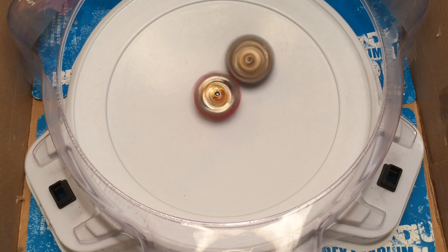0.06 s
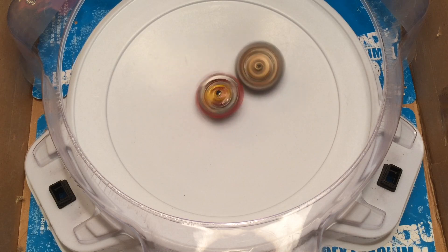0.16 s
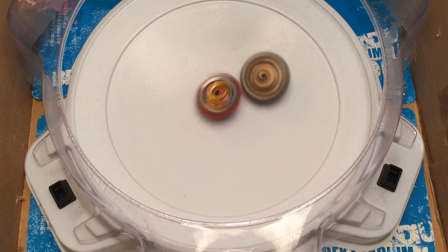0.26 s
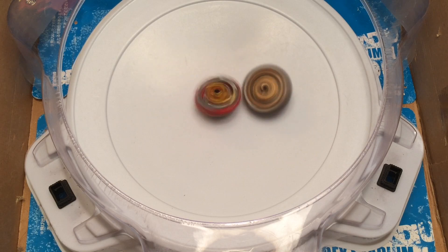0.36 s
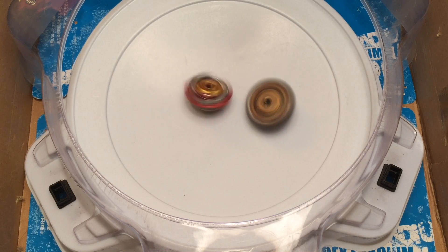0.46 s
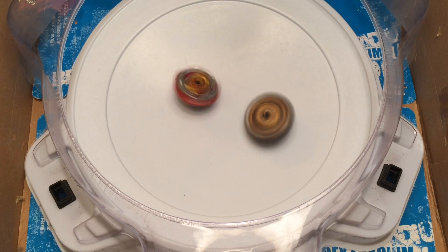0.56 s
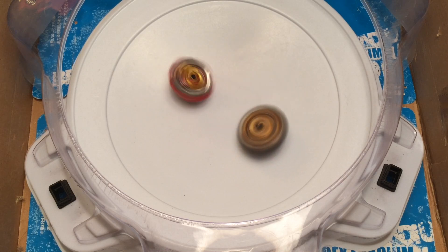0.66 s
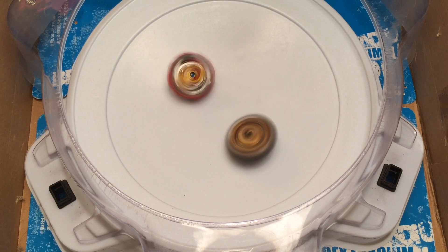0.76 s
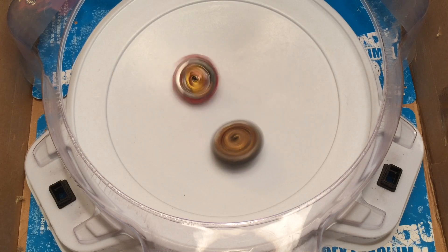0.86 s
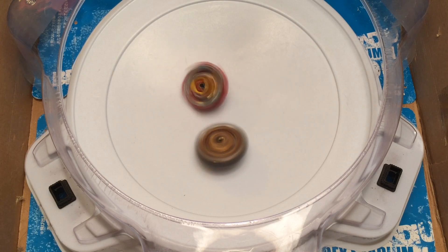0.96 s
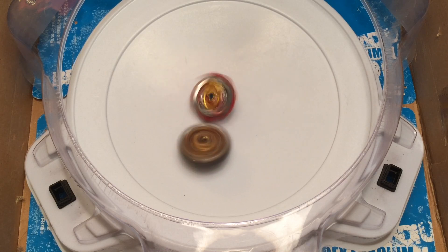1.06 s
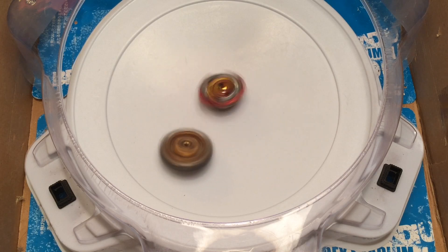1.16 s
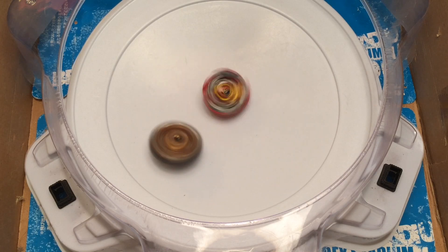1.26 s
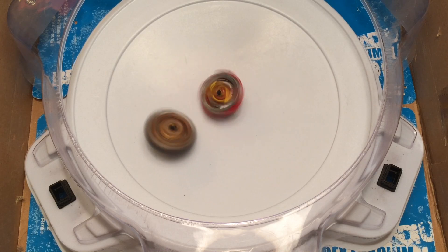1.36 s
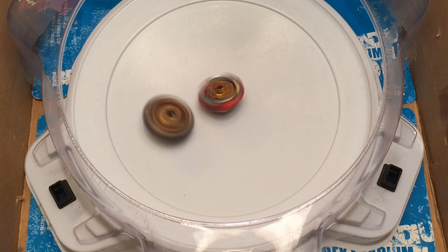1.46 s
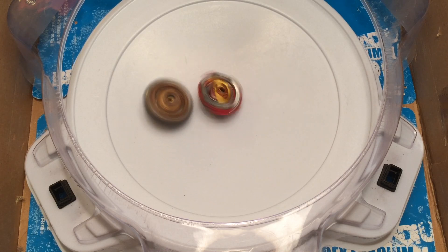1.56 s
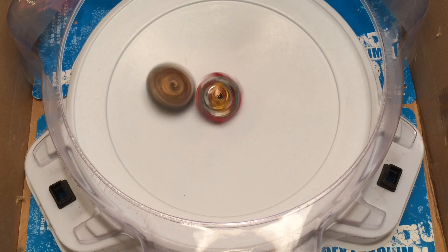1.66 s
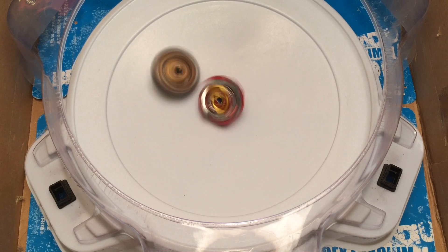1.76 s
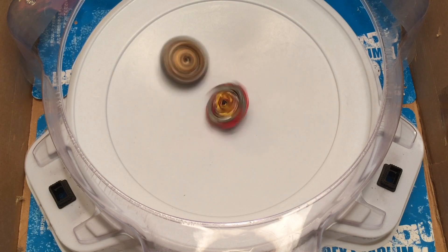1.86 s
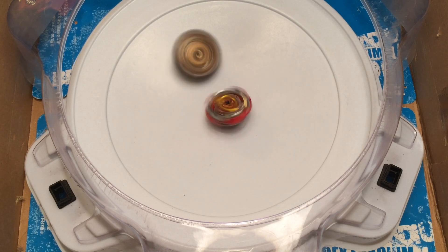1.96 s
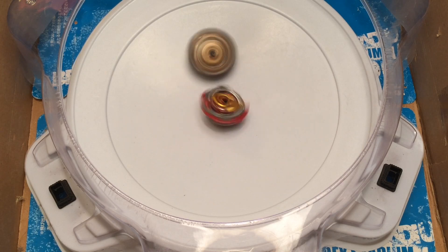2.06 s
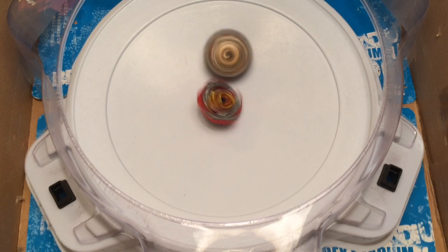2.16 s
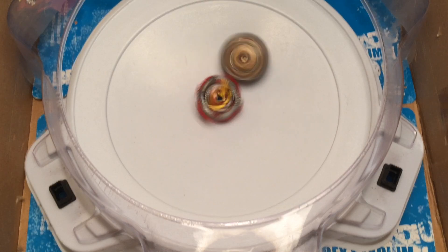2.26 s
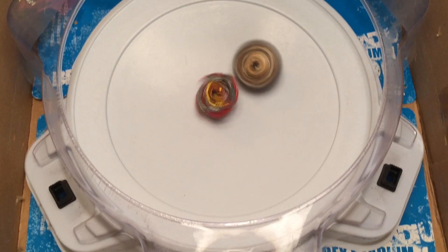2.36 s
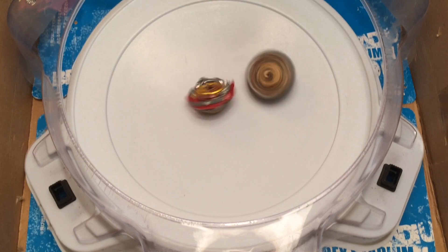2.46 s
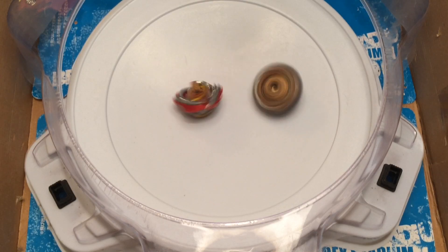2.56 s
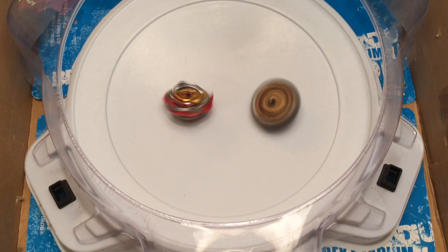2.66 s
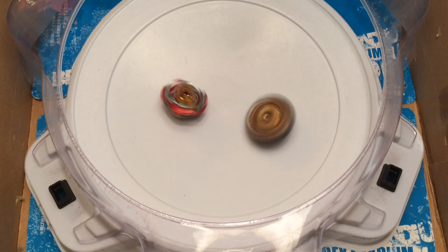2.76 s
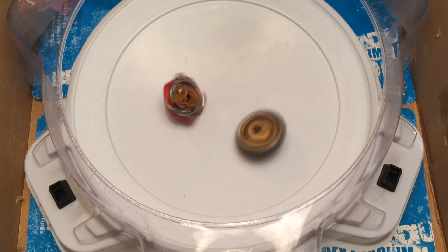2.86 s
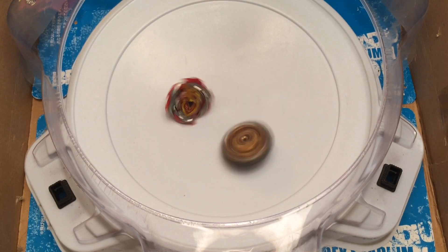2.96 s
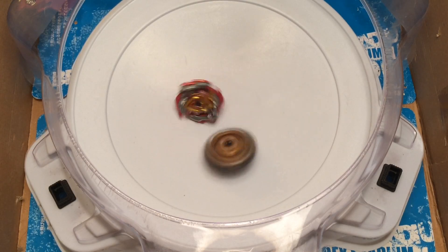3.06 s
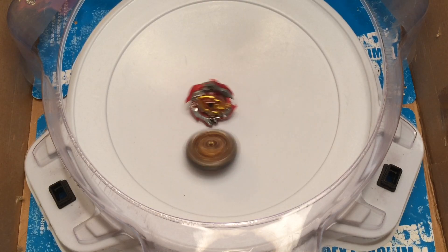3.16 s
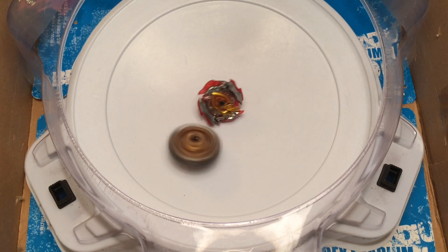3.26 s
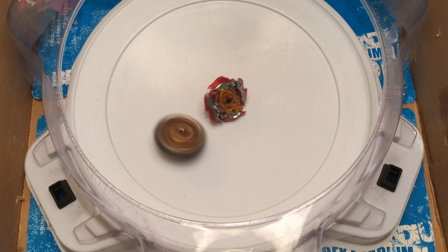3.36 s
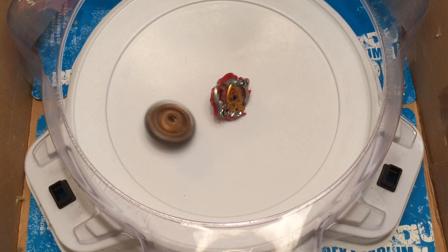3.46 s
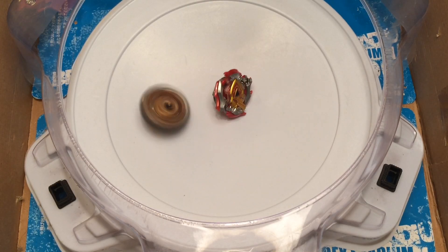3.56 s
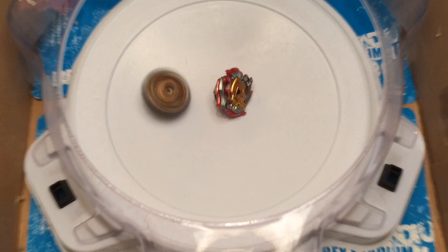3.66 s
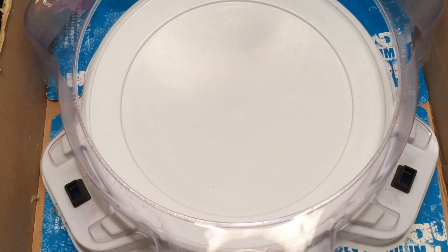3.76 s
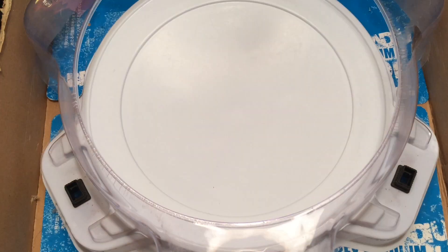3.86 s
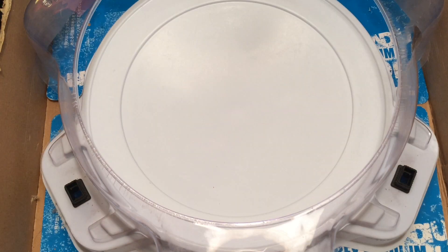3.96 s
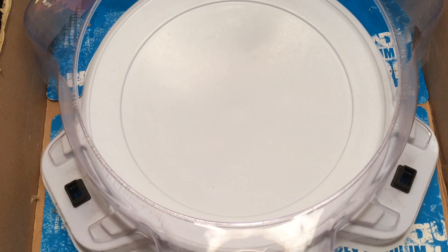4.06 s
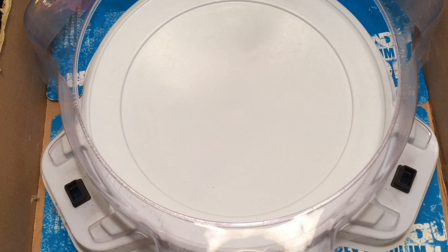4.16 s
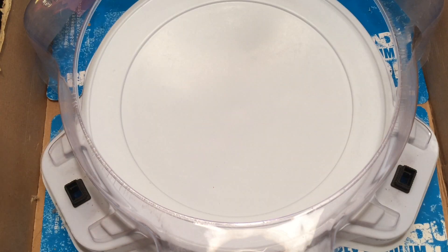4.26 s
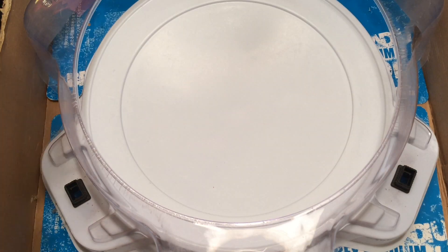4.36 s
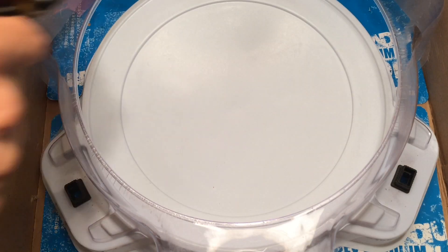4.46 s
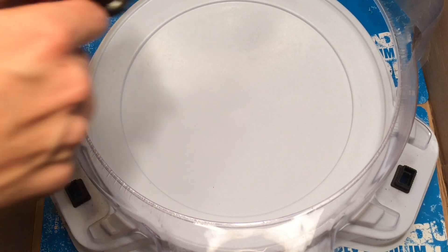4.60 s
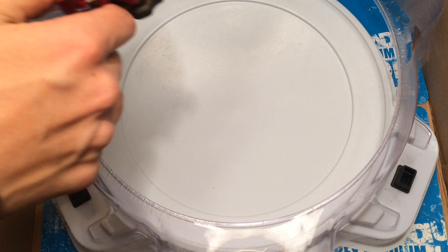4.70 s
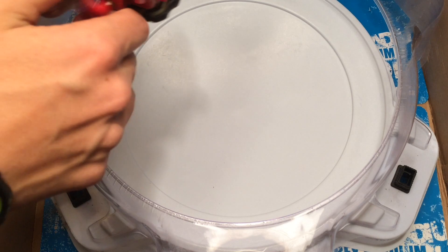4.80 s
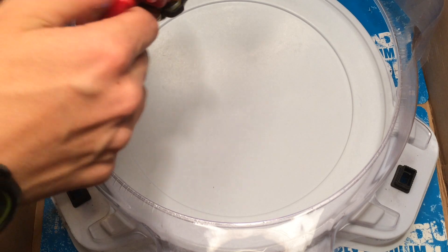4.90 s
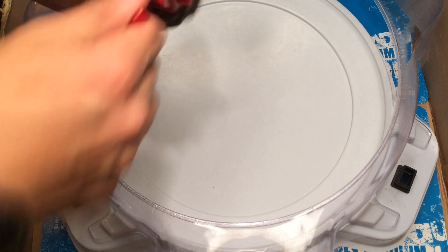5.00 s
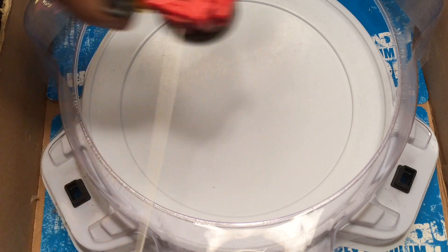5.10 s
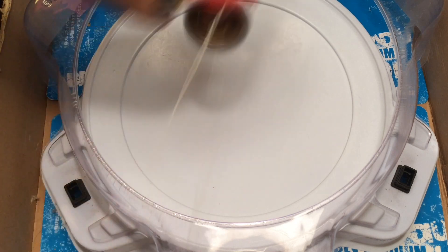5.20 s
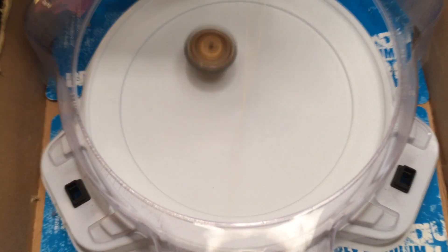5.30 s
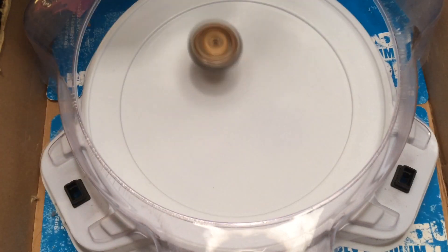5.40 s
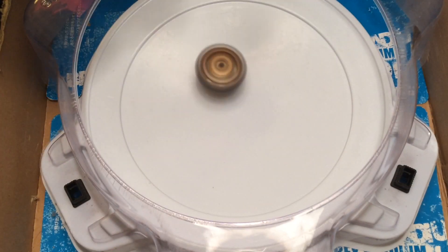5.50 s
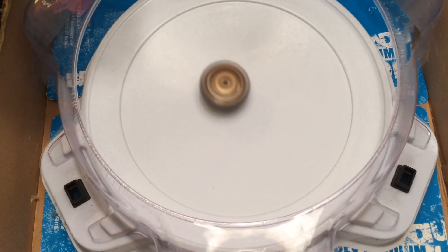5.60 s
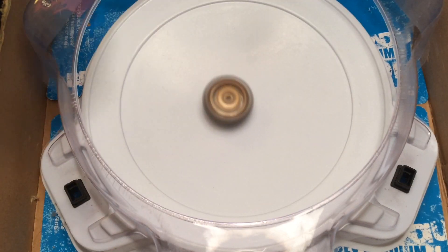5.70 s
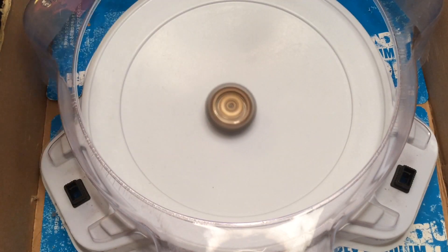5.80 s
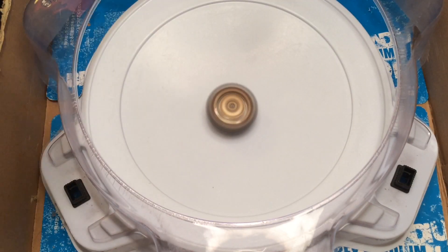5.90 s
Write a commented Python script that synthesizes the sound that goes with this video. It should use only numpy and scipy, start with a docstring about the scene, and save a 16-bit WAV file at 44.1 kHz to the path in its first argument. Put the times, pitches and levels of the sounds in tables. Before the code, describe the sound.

Close up in a quiet, small room, a pair of toy tops whirs and rattles on a plastic arena floor, clashing four times with bright metallic clacks. After a sudden lull and a few small plastic clicks, a launcher's cord is pulled with a loud zipping rasp. A single top clatters into the bowl amid a sharp snap and a high ping, then hops and keeps spinning with a drumming hum.

```python
"""Two toy tops with metal rings spin in a plastic bowl: their tips whir on it and a loose part ticks once
a turn. They clash four times, setting the rings singing, and then a top hops twice. The sound fades to a
quiet room, where a hand clicks a top into a launcher and rips the toothed cord. The top drops into the
bowl, a metal part of the launcher pings, and the top bounces, skips and spins on alone."""
import sys
import numpy as np
from scipy import signal
from scipy.fft import rfft, irfft, next_fast_len
from scipy.io import wavfile
from scipy.ndimage import uniform_filter1d

SR = 44100
rng = np.random.default_rng(int(sys.argv[2]) if len(sys.argv) > 2 else 0)


def inscribe(sig):
    """Save sig as 16-bit PCM at rate SR to the path in sys.argv[1].

    A 1-D sig is mono; a 2-D sig holds one channel per row.
    Samples are clipped to [-1, 1] before scaling.
    """
    pcm = np.round(np.clip(np.atleast_2d(sig).T, -1, 1) * 32767)
    wavfile.write(sys.argv[1], SR, pcm.astype(np.int16))


N = 261954
T = np.arange(N) / SR


# How loud the tips roll, one list a round: time_s, rumble_db, boom_db, fizz_db
ROLLING_LEVELS = [
    [(0.0, -43, -46.5, -43.5), (0.3, -44, -49.5, -50.5), (0.6, -45.5, -46, -49), (1.1, -43, -43.5, -50),
     (1.3, -46.5, -55, -51), (1.65, -45, -45, -47.5), (2.25, -42.5, -53.5, -45.5), (2.5, -45, -55.5, -46.5),
     (3.15, -45.5, -47, -46.5), (3.84, -45, -55.5, -47.5), (3.86, -64, -64, -59.5)],
    [(5.36, -9.5, -24, -24.5), (5.42, -29, -45, -22.5), (5.488, -77, -35, -32), (5.636, -49, -27, -28.5),
     (5.792, -28, -34, -31.5), (5.94, -22, -27, -31.5)],
]
# A "tone" says how strong a noise is, low to high. Every tone has: pitch_hz, level_db
RUMBLE_TONE = [(140, -37), (230, -12), (285, -4), (324, -4), (407, -0.5), (561, -1.5), (612, -2.5),
               (775, -8), (1170, -6), (1280, -12), (1830, -14), (2720, -13.5), (3000, -13.5), (3900, -46.5),
               (6600, -120)]  # two tops
LONE_RUMBLE_TONE = [(140, -39), (230, 4), (259, -30), (291, -6), (369, -7.5), (398, -4.5), (580, -0.5),
                    (862, -15), (2290, -21.5), (3000, -18.5), (3900, -36), (6600, -120)]  # one fast top near the middle
BOOM_TONE = [(18, -43.5), (30, -13), (72, -2.5), (96, 1), (140, -5), (209, -10), (230, -8.5), (300, -40),
             (510, -120)]  # the bowl's floor
FIZZ_TONE = [(880, -34), (1500, 3), (2730, -4), (3020, 1), (3550, 0), (3920, 1.5), (4420, -3), (6940, -2.5),
             (8390, -9.5), (9180, -11), (15100, -15), (15900, -18.5), (16400, -40)]  # the tips' high hiss
def rolling_tips():
    """Tips grind on the bowl, pressing harder once a turn; the shaking keeps the rings singing."""
    tick_s = tick_times()
    alone = T > ROLLING_LEVELS[1][0][0]
    tick_turns = np.interp(T, tick_s, np.arange(len(tick_s)))
    turns = np.where(alone, lone_turns(), tick_turns - 0.25)  # press a quarter turn after the tick
    throb_db = np.where(alone, 3.5, 1.0) * np.cos(2 * np.pi * turns)
    wobble = evened(uniform_filter1d(uniform_filter1d(noise(N), 500), 500))
    press = gain_of(throb_db + 1.7 * wobble)
    boom = colour(press * noise(N), BOOM_TONE)
    fizz = colour(press ** 1.36 * grit(per_s=15000, size_db=1.3), FIZZ_TONE)
    shaking = colour(press * grit(per_s=3000, size_db=2.7), [(3000, 9), (15000, -11)])
    fizz += gain_of(-16.5) * shaken(shaking, struck(RING_NOTES, damping=1.1))
    out = np.zeros(N)
    for rows, tone in zip(ROLLING_LEVELS, (RUMBLE_TONE, LONE_RUMBLE_TONE)):
        rumble = colour(press * grit(per_s=9000, size_db=2.2), tone)
        rumble += gain_of(-9.5) * shaken(rumble, struck(BOWL_NOTES, damping=1.2))
        time_s, *levels_db = np.transpose(rows)
        for db, layer in zip(levels_db, (rumble, boom, fizz)):
            out += gain_of(np.interp(T, time_s, db, left=-140, right=-140)) * layer
    return out


# The ticking top's spin, at the start and after each clash: first_tick_s, turn_s
SPINS = [(.0218, .0325), (.5256, .03328), (1.1773, .03508), (1.8569, .03664), (2.5304, .03889)]
def tick_times(slowing_s=.00008, round_end_s=3.83):
    """One tick a turn; rubbing makes each turn a little longer than the last."""
    ends = [row[0] for row in CLASHES] + [round_end_s]
    turn = np.arange(60)
    runs = [first_s + turn * turn_s + slowing_s * turn ** 2 / 2 for first_s, turn_s in SPINS]
    return np.concatenate([run[run < end] for run, end in zip(runs, ends)])


# The launched top slowing down: time_s, turns_per_s
LONE_SPIN = [(5.4, 64), (5.94, 53)]
def lone_turns():
    """Counts the turns of the launched top."""
    return np.cumsum(np.interp(T, *np.transpose(LONE_SPIN))) / SR


# How hard the loose part knocks: time_s, level_db, ring_offset_db, tock_offset_db
RATTLE = [(0, -47.5, -13, -12), (.15, -42.5, 1, -12), (.56, -34, -12, 10), (0.599, -21.5, -14, 0.5),
          (.8, -28, -6, -9.5), (0.921, -22.5, -13.5, -8), (1.14, -24, -8.5, -1), (1.3, -48.5, -14.5, -15),
          (1.55, -31, -12.5, -10), (1.93, -43, -12.5, -19), (2.05, -36, -19.5, 8.5),
          (2.49, -30, -16.5, -3.5), (2.6, -40, -19.5, -20), (2.71, -28.5, -14, -22), (2.8, -24.5, -18, -7),
          (2.86, -47, -16, -20), (2.94, -27, -14, -20), (3.04, -26, -25, -15), (3.26, -19, -22, -17),
          (3.45, -22.5, -17, -25), (3.771, -27, -10, -16), (3.821, -38.5, -15, -27)]
# Its bright tick: pitch_hz, level_db
TICK_TONE = [(3000, -34), (4000, -12), (5500, -13), (6600, -2), (7800, -2), (8800, -10), (10000, -22.5),
             (13000, -16.5), (16000, -25.5)]
# The duller tock of its plastic seat: pitch_hz, level_db, ring_s
SEAT_NOTES = [(2600, -5.5, 0.017), (3500, -1.5, .014), (3970, -3, .02), (4700, -5.5, .012)]
def loose_part(mix, hops_s=(3.043, 3.324)):
    """A loose part knocks twice in quick succession, sounding the metal ring, its seat and the bowl."""
    t = T[:800]
    time_s, knock_db, sing_db, tock_db = np.transpose(RATTLE)
    for s in tick_times():
        in_air = np.any(np.abs(s - np.array(hops_s)) < .01)  # mid-hop the part barely knocks
        db = np.interp(s, time_s, knock_db) - 13 * in_air + 2.1 * noise()
        ring_db = np.interp(s, time_s, sing_db) + noise()
        late = np.maximum(t - rng.uniform(0.00041, 0.0023), 0)
        shape = (t / .0003) * np.exp(1 - t / .0003)
        shape += .35 * (late / .001) * np.exp(1 - late / .001)  # the weaker second knock
        tick = shape * colour(noise(len(t)), np.multiply(TICK_TONE, [rng.uniform(1.0, 1.03), 1]))
        add(mix, s, gain_of(db + 0.5) * tick / np.abs(tick).max())
        ring = struck(RING_NOTES, spread_db=1.5, detune=0.0042, damping=1.8)
        add(mix, s, gain_of(db + ring_db) * ring)
        tock = fade_in(struck(SEAT_NOTES, spread_db=4.5, detune=.015), 0.00099)
        add(mix, s, gain_of(db + np.interp(s, time_s, tock_db)) * tock)
        nudge = struck(bowl_near(550, slope_db=3), spread_db=5.5, detune=0.062, damping=2.2)
        add(mix, s, gain_of(db - 14.5) * nudge)


# Tops meeting: start_s, level_db, rise_s, scrape_s, clack_offset_db, thump_offset_db, ring_offset_db
CLASHES = [(0.4959, -2.5, 0.00046, 0.0034, -19, -12, -9), (1.1602, -2, 0.0019, 0.0066, -8.5, -12.5, -10),
           (1.8223, -5, 0.00011, 0.0028, -13.5, -22.5, -9.5),
           (2.5135, -3.5, 0.00072, 0.0029, -24, -14.5, -6)]
# The rims' sharp crack and dull clack: pitch_hz, level_db
CRACK_TONE = [(1350, -35.5), (2300, -7.5), (3280, -7), (3900, -2.5), (4450, -6), (6340, 1.5), (9820, -2),
              (11200, -3.5), (13800, -2.5), (15800, -13.5), (16500, -24.5)]
CLACK_TONE = [(300, -26.5), (500, 0), (800, -10), (1400, 0.5), (2300, -4.5), (3200, -26)]
# The tops' metal rings: pitch_hz, level_db, ring_s
RING_NOTES = [(3117, -5, 0.07), (4030, -4.5, .08), (5940, -13.5, .12), (7060, -7, .09), (8370, -5.5, .1),
              (10400, -10.5, 0.11), (12100, -2, .13), (12030, -1, 0.08), (12800, -12, .1), (13470, -10, .1),
              (13850, 3, 0.12), (15300, -6, .15), (15480, -1, 0.14)]
def clashes(mix):
    """Rims scrape across each other, the rings sing and the bowl thumps."""
    t = T[:4000]
    for s, db, rise_s, scrape_s, clack_db, thump_db, ring_db in CLASHES:
        shape = np.exp(-(t / scrape_s) ** 2) + 0.17 * np.exp(-t / 0.013)
        rims = colour(noise(len(t)), CRACK_TONE) + gain_of(clack_db) * colour(noise(len(t)), CLACK_TONE)
        add(mix, s, gain_of(db - 4) * fade_in(shape * rims, rise_s))
        ring = struck(RING_NOTES, spread_db=0.5, detune=.002, damping=1.7)
        add(mix, s, gain_of(db + ring_db) * ring)
        low_thump = struck(bowl_near(210, slope_db=2.5), spread_db=3, detune=0.12, damping=1.1)
        add(mix, s + .004, gain_of(db + thump_db - 5.5) * low_thump)
        short_thump = struck(BOWL_NOTES, spread_db=2.5, detune=.05, damping=2.6)
        add(mix, s + .002, gain_of(db + thump_db) * short_thump)


# Pulling the cord, then the gear running out: time_s, level_db
CORD_PULL = [(5.09, -68), (5.105, -46), (5.144, -31.5), (5.152, -20.5), (5.18, -17.5), (5.2, -11),
             (5.228, -10.5), (5.26, -15), (5.34, -14.5), (5.379, -26), (5.42, -26), (5.471, -27),
             (5.5, -72), (5.7, -69), (5.809, -38.5), (5.94, -40.5)]
# Teeth hitting the gear: time_s, teeth_per_s, whine_offset_db, shell_offset_db
TEETH = [(5.14, 900, -11, -6), (5.18, 1130, -3, -18), (5.21, 2250, 1.5, 3), (5.245, 3500, 5.5, 7.5),
         (5.261, 2700, -3, -16), (5.28, 2500, 3, -21), (5.329, 1700, -7, -23), (5.38, 1200, -15, -11),
         (5.45, 1800, -30, 0)]
# Rasping plastic: pitch_hz, level_db
RASP_TONE = [(240, -53), (400, -23.5), (830, -20.5), (940, -9.5), (1550, -13), (2620, -12), (2830, -8.5),
             (3630, -8.5), (4450, -11.5), (6260, -11.5), (13400, -15), (15700, -23.5), (16400, -55)]
# The launcher's shell: pitch_hz, level_db, ring_s
SHELL_NOTES = [(2262, -6, .05), (2839, 4.5, 0.068), (3192, -4.5, .04), (3355, -0.5, 0.031), (4550, 4, 0.02)]
def rip_cord():
    """Teeth hit the gear faster, then slower: a whine rises and falls inside a gritty rasp."""
    time_s, teeth_per_s, whine_db, shell_db = np.transpose(TEETH)
    jitter = evened(uniform_filter1d(noise(N), 60))
    rate_hz = np.interp(T, time_s, teeth_per_s)
    phase = 2 * np.pi * np.cumsum(rate_hz * (1 + .055 * jitter)) / SR
    whine = sum(gain_of(at_pitch(RASP_TONE, k * rate_hz) + 9) * np.sin(k * phase) for k in (1, 2, 3))
    snags = gain_of(2.4 * evened(uniform_filter1d(noise(N), 150)))
    rasp = colour(grit(per_s=15000, size_db=1.5), RASP_TONE)
    shell = shaken(grit(per_s=3500, size_db=4.3), struck(SHELL_NOTES))
    rasp += gain_of(np.interp(T, time_s, shell_db)) * shell
    pull = gain_of(np.interp(T, *np.transpose(CORD_PULL), left=-140))
    return pull * snags * (rasp + gain_of(np.interp(T, time_s, whine_db)) * whine)


# Tops landing: start_s, level_db, spot_hz, thump_offset_db, clatter_offset_db, clatter_s
BOUNCES = [(3.084, -38, 580, 5, 6, 0.0035), (3.315, -39.5, 503.4, -5.5, -18, 0.0047),
           (5.255, -11, 424, -9, 12, 0.015), (5.289, -5.5, 844, -25, 0, 0.03),
           (5.345, -3, 460, -5.5, -4.5, 0.019), (5.544, -7, 606, 2.5, -1, 0.015),
           (5.653, -10, 427, -19, 4.5, 0.0051), (5.717, -14.5, 493, -7, 1.5, 0.0038)]
def bounces(mix, choke=4.24):
    """A landing top rings the bowl and clatters; its pressing tip chokes most of the ringing."""
    t = T[:3000]
    for s, db, spot_hz, thump_db, clatter_db, clatter_s in BOUNCES:
        thud = struck(bowl_near(spot_hz, slope_db=9), spread_db=1, detune=0.013, damping=choke)
        floor = struck(bowl_near(208, slope_db=17), spread_db=4.1, detune=0.06, damping=choke)
        thud += gain_of(thump_db) * floor
        thud += gain_of(-17) * struck(BOWL_NOTES, spread_db=2, detune=.03, damping=1.2)
        thud[:len(t)] += gain_of(-3.5) * np.sin(2 * np.pi * 210 * t) * np.exp(-t / .004)
        add(mix, s, gain_of(db + 6.5) * fade_in(thud, 0.0003))
        clatter = np.exp(-t / clatter_s) * colour(noise(len(t)), RASP_TONE)
        add(mix, s, gain_of(db + clatter_db) * fade_in(clatter, 0.00018))


# The plastic bowl: pitch_hz, level_db, ring_s
BOWL_NOTES = [(107, -20, 0.28), (139.3, -0.5, 0.13), (187, -4, 0.15), (208, -4, 0.069), (283.6, -8.5, 0.17),
              (395, -9.5, 0.25), (461.6, 0, 0.047), (545.6, -7, 0.21), (615, -8, 0.15), (801.5, -7.5, 0.11),
              (1011, -4.5, 0.096), (1192, -10.5, 0.12), (1346, -1.5, .05), (1546, 0, 0.071),
              (1770, -5.5, 0.057), (2110, -13.5, 0.064)]
def bowl_near(spot_hz, slope_db):
    """Each spot on the bowl favours one pitch; notes lose slope_db for each octave away from it."""
    return [(hz, db - slope_db * abs(np.log2(hz / spot_hz)), ring_s) for hz, db, ring_s in BOWL_NOTES]


# Small plastic knocks and clicks: start_s, level_db, pitch_hz, snap_offset_db
KNOCKS = [(2.248, -18.5, 2450, -32), (3.876, -32, 3500, -33), (3.917, -43, 5400, -19.5),
          (4.0301, -38, 1670, -11.5), (4.045, -36.5, 4640, 3.5), (4.7532, -43.5, 2900, -22),
          (4.8856, -38.5, 2800, -7.5), (4.9239, -28.5, 6340, 0), (4.937, -30.5, 2410, -28.5),
          (5.0814, -47, 1980, -28), (5.1016, -28.5, 2691, -21), (5.1533, -14, 2800, 4),
          (5.3005, 5.5, 5460, 0), (5.4275, -7, 2700, -21), (5.461, -5.5, 3260, -1), (5.47, -11, 2800, 1),
          (5.6027, -5.5, 3120, -15), (5.749, -9, 2900, -15), (5.804, -12.5, 2880, -23),
          (5.813, -9, 2870, -30), (5.904, -21, 1682, -12), (5.921, -12, 2770, -13)]
def plastic_knocks(mix, ring_s=0.036):
    """Knocked plastic gives a short ring and a dull burst around one pitch, plus a bright snap."""
    t = T[:3000]
    for s, db, hz, snap_db in KNOCKS:
        notes = [(hz, 0, ring_s), (hz * 1.2, -5, ring_s), (hz * .8, -6, ring_s)]
        ring = struck(notes, spread_db=2, detune=.03, damping=1.5)[:len(t)]
        burst = colour(noise(len(t)), [(hz / 4, -25), (hz, 0), (hz * 3, -22)])
        snap = gain_of(snap_db) * noise(len(t))
        knock = .5 * ring + .45 * (burst + snap) * gain_of(-60 * t / ring_s)
        add(mix, s, gain_of(db) * fade_in(knock, .0004))


# A hit on a small metal part of the launcher: start_s, level_db
PING = [(5.4949, 5)]
# That metal part: pitch_hz, level_db, ring_s
PING_NOTES = [(4200, -14, .8), (4423, -14, .7), (4640, -17, .4), (11560, -7, .3), (11783, -5, .33),
              (7693, -10, .08), (8100, -14, .08), (8915, -20, .1), (11200, -12, .06), (11360, -10, .15),
              (11950, -8, .07), (12130, -2, .09), (12380, -10, .08), (12620, -15, .4), (13180, -18, .27),
              (13480, -20, .2), (15500, -18, .1)]
def launcher_ping(mix):
    """A sharp snap leaves the metal ringing with high notes."""
    t = T[:2000]
    for s, db in PING:
        add(mix, s, gain_of(db - 4.5) * struck(PING_NOTES))
        add(mix, s, gain_of(db - 11.5) * np.exp(-t / 0.013) * colour(noise(len(t)), CRACK_TONE))
        add(mix, s, gain_of(db - 25) * np.exp(-t / 0.0049) * colour(noise(len(t)), CLACK_TONE))


# How loud the lone top skips: time_s, level_db
SKIP_LEVELS = [(5.72, -56), (5.75, -23), (5.79, -30), (5.85, -31), (5.9, -20), (5.94, -24)]
def skipping_top():
    """The fast lone top skips once a turn, drumming on the bowl."""
    skips = np.diff(np.floor(lone_turns()), prepend=0) * gain_of(1.46 * noise(N))
    drum = struck(bowl_near(570, slope_db=20), damping=1.3)
    drum += 0.81 * struck(bowl_near(128, slope_db=13), damping=1.5)
    return gain_of(np.interp(T, *np.transpose(SKIP_LEVELS), left=-140)) * shaken(skips, drum)


# How long the room's echo takes to fall 60 dB: pitch_hz, fade_s
ECHO_TIMES = [(200, 0.3), (1400, 0.25), (3700, 0.23), (9700, 0.17)]
def room_echo(sound):
    """Many tiny echoes blur into a tail whose high pitches die first."""
    echoes = np.zeros(SR // 2)
    slots = np.arange(100, len(echoes) - 20, 20)
    echoes[slots + rng.integers(0, 20, len(slots))] = rng.choice([-1., 1.], len(slots))
    hz, t, bands = signal.stft(echoes, SR, nperseg=256)
    dying = gain_of(-60 * t / at_pitch(ECHO_TIMES, hz)[:, None])
    tail = signal.istft(bands * dying, SR, nperseg=256)[1]
    return signal.fftconvolve(sound, tail / np.linalg.norm(tail))[:N]


# The quiet room: pitch_hz, level_db
QUIET_TONE = [(15, -65), (25, -37), (80, -12.5), (111, -3.5), (134, -22), (167, -15.5), (258, -23),
              (348, -23), (829, -29.5), (899, -26.5), (1120, -31.5), (15100, -43.5), (16400, -63.5)]
def quiet_room():
    """A faint, steady low hum and hiss."""
    return gain_of(-54) * colour(noise(N), QUIET_TONE)


def struck(notes, spread_db=0, detune=0, damping=1.):
    """A hit object's notes, varied by spread_db and detune; each falls 60 dB in ring_s / damping."""
    t = T[:SR // 3]
    out = np.zeros(len(t))
    for k, (hz, db, ring_s) in enumerate(notes):
        level = gain_of(db + spread_db * noise() - 60 * damping * t / ring_s)
        pitch_hz = hz * (1 + detune * noise())
        out += (-1) ** k * level * np.sin(2 * np.pi * pitch_hz * t)
    return out / np.abs(out).max()


def shaken(pushes, ring):
    """Every little push starts the same ring."""
    return evened(signal.fftconvolve(pushes, ring)[:N])


def grit(per_s, size_db):
    """Noise broken into grains of uneven size."""
    sizes = gain_of(size_db * np.minimum(rng.exponential(1, N), 5))
    return sizes * (rng.random(N) < per_s / SR) * noise(N)


def colour(sound, tone):
    """Shapes a sound's lows and highs with a tone table."""
    size = next_fast_len(len(sound))
    gains = gain_of(at_pitch(tone, np.fft.rfftfreq(size, 1 / SR)))
    return evened(irfft(rfft(sound, size) * gains, size)[:len(sound)])


def at_pitch(table, hz):
    """Looks up a table's value at any pitch."""
    pitches, values = np.transpose(table)
    return np.interp(np.log(hz + 1), np.log(pitches + 1), values)


def noise(count=None):
    """Plain hiss, or one random number."""
    return rng.standard_normal(count)


def fade_in(sound, rise_s):
    """Softens a sound's start."""
    return sound * (1 - np.exp(-T[:len(sound)] / rise_s))


def gain_of(db):
    """Turns decibels into a multiplier."""
    return 10 ** (np.asarray(db) / 20)


def evened(sound):
    """Scales to an average strength (rms) of 1."""
    return sound / np.sqrt(np.mean(sound ** 2) + 1e-20)


def add(mix, start_s, sound):
    """Mixes a sound in at start_s."""
    part = mix[round(start_s * SR):][:len(sound)]
    part += sound[:len(part)]


def scene():
    """The cord and the hits with their echo, over the rolling, the skipping and the quiet room."""
    hits = rip_cord()
    for add_to in (loose_part, clashes, bounces, plastic_knocks, launcher_ping):
        add_to(hits)
    bass_cut = signal.butter(2, 90, "high", fs=SR, output="sos")  # a small bowl gives little deep bass
    hits = signal.sosfilt(bass_cut, hits)
    quiet = quiet_room()
    return (hits + gain_of(-8) * room_echo(hits) + rolling_tips() + skipping_top() + quiet)[None]


# Overall volume, dipping between the two rounds: time_s, gain
FADE = [(0, 0.85), (3.82, 0.96), (3.85, 0.027), (3.86, 0.024), (3.875, 0.33)]
def record(dry, highest_hz=16400):
    """Fades between the rounds, squashes the loudest peaks and cuts the very highest pitches."""
    faded = dry * np.interp(T, *np.transpose(FADE))
    squashed = faded / (1 + (np.abs(faded) / 1.05) ** 6) ** (1 / 6)
    treble_cut = signal.firwin(511, highest_hz, window=("kaiser", 9), fs=SR)
    return signal.oaconvolve(squashed, treble_cut[None], "same")


dry = scene()
out = record(dry)
inscribe(out)
```